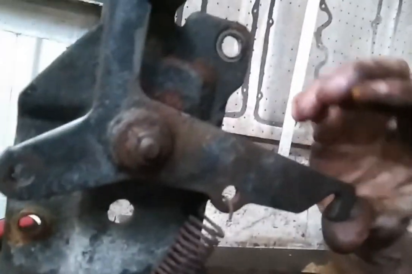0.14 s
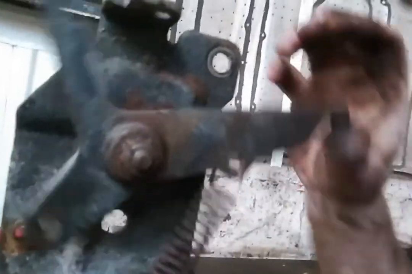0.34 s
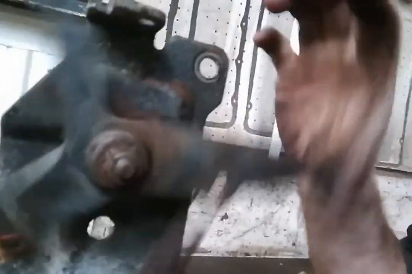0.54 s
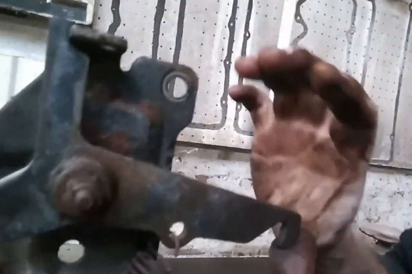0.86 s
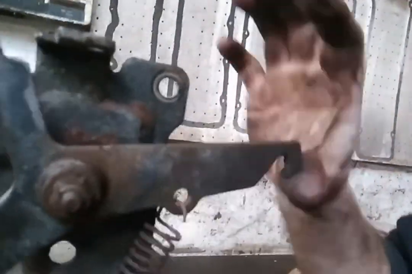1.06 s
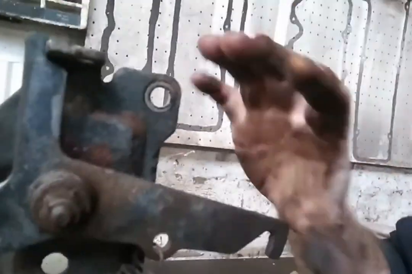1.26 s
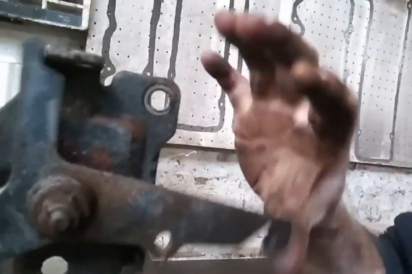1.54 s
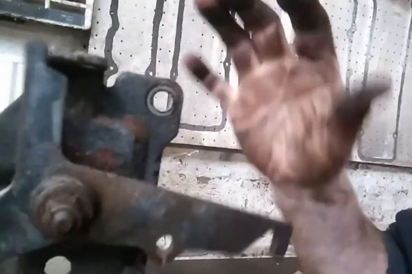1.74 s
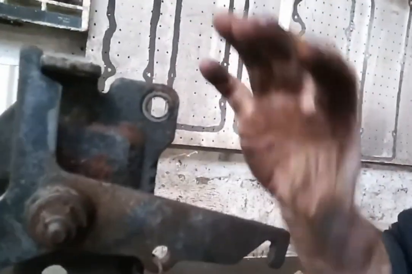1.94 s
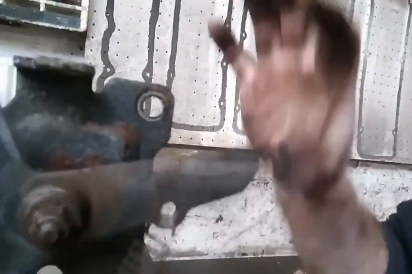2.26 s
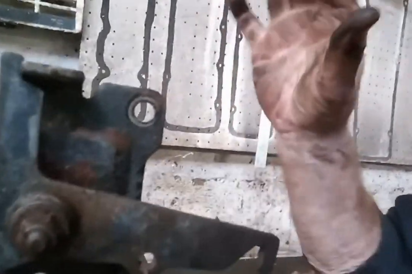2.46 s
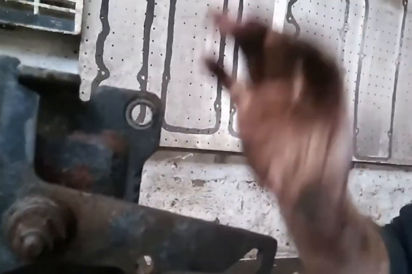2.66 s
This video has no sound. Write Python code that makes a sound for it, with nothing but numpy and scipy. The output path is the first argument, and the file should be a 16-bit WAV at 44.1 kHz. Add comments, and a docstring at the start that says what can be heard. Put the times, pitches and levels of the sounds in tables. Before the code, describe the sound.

A sprung steel lever snaps against its stop, close to a phone microphone in a hard-walled garage. Faint rubbing and scrapes lead to a light click at 0.4 s, a brighter one at 0.47 and a hard clack at 0.62. Another bright clack lands at 1.2, then rapid bouncing clatters at 1.73-1.81 and 2.31-2.38. Small ticks precede blows; low spring hum and short room ring follow.

```python
"""Sprung steel lever in a garage

A greased steel lever on a plate bracket is pushed by hand and snaps back on its coil spring, bouncing
on its stop: each blow is a noise crack over decaying steel modes. Around the blows come scrapes, faint
rustles and one rattle (shaped noise) and ticks (short treble clicks); between and after the blows the
spring hums (a fluttering low tone). A hard-walled garage rings on as a diffuse noise tail, over low
rumble and faint hiss. All is picked up by one phone microphone, with its bass cut and noise suppressor."""
import sys
import numpy as np
from scipy import signal
from scipy.fft import rfft, irfft
from scipy.io import wavfile
from scipy.ndimage import uniform_filter1d

SR = 44100
rng = np.random.default_rng(int(sys.argv[2]) if len(sys.argv) > 2 else 0)


def pcm_store(signal):
    """Save signal as 16-bit PCM."""
    levels = np.round(np.clip(np.atleast_2d(signal), -1, 1) * 32767)
    wavfile.write(sys.argv[1], SR, levels.astype(np.int16).T)


def nominal_scale(level):
    """Amplitude ratio for a level in decibels (scalar or array-like)."""
    x = np.asarray(level, float) / 20
    return 10 ** x


N = 123479  # samples
T = np.arange(N) / SR  # s
F = np.fft.rfftfreq(N, 1 / SR)  # Hz


def log_curve(f, points):
    """Gain read from (f/Hz, level/dB) points along a logarithmic frequency axis."""
    p = np.array(points, float)
    return nominal_scale(np.interp(np.log(f + 1), np.log(p[:, 0]), p[:, 1]))


def colour(x, points):
    """Filter by (f/Hz, level/dB) points, without phase shift."""
    f = np.fft.rfftfreq(len(x), 1 / SR)
    return irfft(rfft(x) * log_curve(f, points), len(x))


def unit(x):
    """Scale to rms 1."""
    return x / np.sqrt(np.mean(x ** 2))


def band(hz, width_hz):
    """Noise in a bell-shaped band, rms 1."""
    bell = np.exp(-((F - hz) / width_hz) ** 2)
    return unit(irfft(rfft(rng.standard_normal(N)) * bell, N))


def fade(t, t60):
    """Exponential decay by 60 dB in t60 seconds."""
    return np.exp(-np.log(1000) * t / t60)


def swell(s, rise, hold, t60):
    """Envelope from s seconds: straight rise, hold, exponential release."""
    return np.clip((T - s) / rise, 0, 1) * fade(np.maximum(T - s - rise - hold, 0), t60)


def add(out, x, s):
    """Mix x into out at s seconds."""
    i = int(s * SR)
    out[i:i + len(x)] += x[:N - i]


# low-mid rumble of the place: t/s, level/dB
LOW_MID_RUMBLE = [(0, -59), (.3, -56), (.55, -57), (.75, -46.5), (1.05, -71.5), (1.3, -70.5), (1.65, -71.5),
                  (2.8, -81)]
# deep rumble under it: t/s, level/dB
DEEP_RUMBLE = [(0.0, -87), (0.26, -66), (0.44, -79), (0.68, -51), (1.12, -74), (1.21, -59.5), (1.41, -52.5),
               (1.43, -60), (1.67, -74), (1.74, -45.5), (2.26, -65), (2.31, -55.5), (2.43, -45.5),
               (2.46, -44), (2.77, -68.5), (2.8, -89)]
# colour of the steady hiss: f/Hz, level/dB
HISS_COLOUR = [(180, -39.5), (300, -2), (2320, -12.5), (3130, -10.5), (3890, -22.5), (13300, -32.5),
               (16000, -24)]


def background():
    """Room floor: two bands of low noise following level curves, and a steady faint hiss."""
    low_mid = band(220, 70) * nominal_scale(np.interp(T, *np.array(LOW_MID_RUMBLE).T))
    deep = band(75, 42) * nominal_scale(np.interp(T, *np.array(DEEP_RUMBLE).T))
    hiss = nominal_scale(-84.5) * unit(colour(rng.standard_normal(N), HISS_COLOUR))
    return low_mid + deep + hiss


# ring of the garage by band: f/Hz, relative level/dB, t60/s
GARAGE_BANDS = [(83, -22.5, 0.87), (180, 0, 0.37), (345, -11.5, 0.47), (710, -11.5, 0.54),
                (1300, -16.5, 0.66), (2840, -16.5, 0.58), (5400, -21.5, 0.47), (7500, -31.5, 0.46),
                (11500, -28, 0.19), (14500, -24.5, 0.26)]


def garage(x):
    """Diffuse tail of the hard walls: bands of noise, each dying at its own rate."""
    tail = np.zeros(N)
    for hz, db, t60 in GARAGE_BANDS:
        scale = np.sqrt(hz / 8000) / np.sqrt(t60 * SR / 14)
        tail += nominal_scale(db) * scale * band(hz, hz * 0.58) * fade(T, t60)
    onset = 1 - np.exp(-T / 0.0058)  # the tail builds up over some milliseconds
    return signal.fftconvolve(x, (tail * onset)[:SR])[:N]


# soft bumps of the palm on the lever: middle t/s, level/dB, f/Hz, half-length/s
PALM_BUMPS = [(.225, -61, 367, 0.056), (.335, -67, 398, 0.018), (1.03, -75.5, 422, 0.036),
              (1.645, -65.5, 440, 0.024), (1.722, -49, 250, 0.0099), (2.303, -48.5, 221, .008)]
# faint squeaks of the pivot: middle t/s, level/dB, f/Hz, half-length/s
PIVOT_SQUEAKS = [(1.025, -76, 4360, 0.026), (1.04, -75.5, 3180, 0.0088)]


def hand():
    """Dull palm bumps and thin squeaks, each a short bell-shaped swell of narrow noise."""
    out = np.zeros(N)
    for rows, relative_width in ((PALM_BUMPS, 0.24), (PIVOT_SQUEAKS, 0.019)):
        for s, db, hz, length in rows:
            out += nominal_scale(db) * band(hz, hz * relative_width) * np.exp(-((T - s) / length) ** 2)
    return out


# low spring hum, swelling between and after the blows: start t/s, level/dB, f/Hz, rise/s, t60/s
SPRING_HUM = [(.52, -47, 180, .02, 1), (.625, -27, 166.6, .025, 0.36), (.8, -47.5, 162.4, .04, 0.91),
              (1.14, -48.5, 170, .02, 0.31), (1.225, -38, 164.2, .03, 0.92),
              (1.295, -40.5, 169.5, .02, 0.25), (1.39, -53, 164.2, .02, 1),
              (1.815, -27.5, 149.6, .04, 0.33), (1.98, -44.5, 160.8, .05, 0.45),
              (2.41, -35.5, 147.6, .04, 0.47)]
HUM_PURE = 0.92  # steady share of the tone's amplitude


def spring():
    """The coil spring hums low, mostly tone, with flutter and a looser noisy part."""
    wobble = HUM_PURE + np.sqrt(1 - HUM_PURE ** 2) * band(0, 20)
    loose = nominal_scale(-9.5) * band(170, 32)
    out = np.zeros(N)
    for s, db, hz, rise, t60 in SPRING_HUM:
        tone = np.sqrt(2) * wobble * np.sin(2 * np.pi * hz * T)
        out += nominal_scale(db) * swell(s, rise, 0, t60) * (tone + loose)
    return out


# pitches of the lever and bracket modes: f/Hz
STEEL_HZ = [706, 746, 780, 990, 1490, 1535, 1780, 2180, 2850, 2960, 3140, 3415, 3770, 4280, 5300, 5830,
            7340, 8180, 8330, 9580, 10500, 10860, 12500, 13595, 14390, 15495]
# how those modes ring, one row per pitch: level/dB, t60/s
STEEL_RINGS = [(-7.5, 0.1), (-7.5, 0.09), (-31.5, 0.93), (-16, 0.091), (1, 0.11), (-5, 0.1), (-2, 0.092),
               (-12.5, .12), (-9.5, 0.067), (-12, 0.081), (-2, 0.051), (2.5, 0.053), (-9, .06),
               (-1.5, 0.041), (-2.5, 0.045), (-1.5, 0.048), (-4, 0.033), (-22.5, 0.39), (-7.5, .05),
               (-20, 0.043), (-12, 0.036), (-12, .06), (-11, 0.014), (-14.5, 0.045), (-13, .03),
               (-5, 0.045)]
SCATTER_DB, DETUNE = 2.5, 0.0042  # spread of mode level, and of pitch as a fraction
FLUTTER, FLUTTER_HZ = 0.35, 56.3  # depth, and random points per second


def steel(scatter):
    """Ring of each steel mode; rows of scatter vary its level, phase (cycles) and pitch; each flutters."""
    t = T[:SR]
    level_scatter, phase, pitch_scatter = scatter[:, :, None]
    level_db, t60 = np.array(STEEL_RINGS).T[:, :, None]
    knots = rng.standard_normal((len(STEEL_HZ), SR // 100))
    wander = np.array([np.interp(t * FLUTTER_HZ, np.arange(len(k)), k) for k in knots])
    hz = np.array(STEEL_HZ)[:, None] * (1 + DETUNE * pitch_scatter)
    tone = np.sin(2 * np.pi * (hz * t + phase))
    return nominal_scale(level_db + SCATTER_DB * level_scatter) * tone * fade(t, t60) * (1 + FLUTTER * wander)


# starts of the scrapes, faint rustles and one rattle: t/s
RUB_STARTS = [0, .058, .185, .325, .402, .44, .474, .56, 1.076, 1.14, 1.55, 1.634, 1.646, 2.253, 2.285]
# one row per start: level/dB, treble/dB, ring of the steel/dB, attack/s, hold/s, release t60/s
RUB_STROKES = [(-71, -9, -16, 0.013, 0.052, .2), (-61.5, -0.8, -6, 0.0027, .06, .3),
               (-50.5, -1, -11.5, 0.00099, 0.025, .4), (-46.5, -2, 3.3, 0.005, .006, .1),
               (-44, -2, -1.5, 0.0014, 0.0024, .1), (-60.5, -14.5, 2.5, 0.014, 0.019, .1),
               (-33.5, -10, 4.5, 0.0026, 0.007, .12), (-60.5, 3, 2, 0.0064, .05, .1),
               (-43, -6, -2, 0.0064, 0.0085, .12), (-58.5, 2.9, -2, 0.06, 0.021, .1),
               (-72, -1.2, -2, 0.046, 0.064, .1), (-53, -2, -0.5, 0.0037, 0.02, .2),
               (-52, -9, -8, .003, 0.035, 0.12), (-50, -8, 1.5, 0.002, .015, .15),
               (-55, 3.5, 3, 0.012, 0.0085, .1)]
# colour of the rubbing: f/Hz, level/dB
RUB_COLOUR = [(300, -53), (600, -19), (900, -23.5), (1200, -8), (2100, 3.5), (2600, -3), (3300, -1.6),
              (4400, -9.5), (5600, -12), (7800, -5), (9300, -7), (10600, -5.5), (13500, -10.5),
              (15000, -25), (16000, -21.5)]
RUB_TREBLE_HZ = 4740


def scrapes_and_rustles():
    """Dense friction noise of scrapes, rustles and a rattle, partly ringing the steel."""
    grain = nominal_scale(2 * band(0, 150))  # random roughness of the level
    body = steel(np.zeros((3, len(STEEL_HZ)))).sum(axis=0)
    friction = rng.standard_normal(N)
    driven = np.diff(signal.fftconvolve(rng.standard_normal(N), body))[:N]
    split = [(RUB_TREBLE_HZ, 0), (RUB_TREBLE_HZ * 2, -40)]
    rub, ring = (unit(colour(x, RUB_COLOUR)) * grain for x in (friction, driven))
    rub_low, ring_low = colour(rub, split), colour(ring, split)
    rub_high, ring_high = rub - rub_low, ring - ring_low
    out = np.zeros(N)
    for s, (db, treble_db, ring_db, attack, hold, t60) in zip(RUB_STARTS, RUB_STROKES):
        low = rub_low + nominal_scale(ring_db) * ring_low
        high = rub_high + nominal_scale(ring_db) * ring_high
        out += nominal_scale(db) * swell(s, attack, hold, t60) * (low + nominal_scale(treble_db) * high)
    return out


# small ticks of the spring coils: t/s, level before filtering/dB, lowest f/Hz
COIL_TICKS = [(0.3164, -22, 2005), (0.526, -22.5, 4220), (1.1341, -33, 3920), (1.184, -36, 3100),
              (1.7137, -19, 4120), (1.7182, -29.5, 3970), (2.1625, -42.5, 4220), (2.2498, -31.5, 2920),
              (2.2574, -27, 3000)]


def ticks():
    """Spring coils tick: very short noise bursts with the bass cut and the top softened."""
    out, t = np.zeros(N), T[:SR // 20]
    for s, db, low_hz in COIL_TICKS:
        bass_cut = signal.butter(4, low_hz, "high", fs=SR, output="sos")
        soft_top = signal.butter(1, 11000, fs=SR, output="sos")
        burst = rng.standard_normal(len(t)) * fade(t, 0.0035)
        add(out, nominal_scale(db) * signal.sosfilt(np.vstack([bass_cut, soft_top]), burst), s)
    return out


# lever hits the stop: t/s, level/dB, brightness/(dB per octave), narrowing round 3.3 kHz/(dB per
# octave squared), weight of the low knock/dB, strength of its tail/dB
STOP_BLOWS = [(.4025, -32.5, .4, 2.5, -6.5, -3), (0.4685, -15, 5.5, 4, 13.5, -4.5),
              (.618, -5, -1.5, 0.84, 4, -9.5), (1.192, -32.5, -5, 1.5, 3.5, 6),
              (1.199, -2.5, 1.53, -0.27, 1.5, -2.5), (1.21, -8.5, -1.24, 0.83, 3, -1.2),
              (1.729, -2, 1.9, -0.42, -0.7, 3), (1.754, -3, 2, -0.5, -2.5, 0),
              (1.774, -4.5, 1.6, -1.2, -2, -2), (1.788, -11, 1.8, -2.2, -13, -13.5),
              (1.801, -8.5, 0.7, -0.6, -13.5, 3.5), (1.81, -12.5, -2.1, 0.4, -4, 5),
              (2.31, -3, 1.5, 0.22, 4, 0.8), (2.315, -7.5, 2.6, -0.7, -7.5, 0.7),
              (2.338, -3, 2.25, -0.4, 4, -1.5), (2.345, -13.5, 7.5, 1.8, -17.5, -7.5),
              (2.359, -7, -2, 0.34, -3, 5), (2.374, -8, 5, -0.2, 0, -9), (2.379, -8.5, -0.5, 0.5, -1.5, 5)]
# colour of the crack before each blow's own shading: f/Hz, level/dB
CRACK_COLOUR = [(60, -23), (300, -4), (800, -3), (2000, 2.5), (4000, 1.5), (8000, -4), (12000, -4),
                (15500, -10)]
CRACK_DB, CRACK_T60_S, CRACK_RISE_S, CRACK_DULL_HZ = -6, 0.043, 0.00082, 6240
SNAP_DB, SNAP_T60_S = -12, 0.004  # the crack's treble is a shorter snap
RING_DB, RING_TAIL_DB = -13.5, -6  # steel ring heard directly, and its further cut into the tail
KNOCK_BELOW_HZ, LASTING_S = 1200, 0.2


def blows():
    """Each blow is a crack, treble snap and ringing modes; returns the near sound and the tail's feed."""
    near, send = np.zeros(N), np.zeros(N)
    t, hz = T[:SR], np.array(STEEL_HZ)
    lasting = np.array(STEEL_RINGS)[:, 1] > LASTING_S  # long modes follow the strength of the tail
    rise = 1 - np.exp(-t / CRACK_RISE_S)
    dulling = signal.butter(2, CRACK_DULL_HZ, fs=SR, output="sos")
    for s, db, tilt_db, narrow_db, knock_db, tail_db in STOP_BLOWS:
        def shade(f):
            """Level in dB that this blow gives to frequency f."""
            octaves = np.log2(f / 3300)
            return tilt_db * octaves - narrow_db * octaves ** 2 + knock_db * (f < KNOCK_BELOW_HZ)

        modes = steel(rng.standard_normal((3, len(hz))))
        ring = nominal_scale(db + RING_DB) * rise * (nominal_scale(shade(hz) + 2 * tail_db * lasting) @ modes)
        noise = unit(colour(rng.standard_normal(len(t)), [(f, d + shade(f)) for f, d in CRACK_COLOUR]))
        dull = signal.sosfilt(dulling, noise) * fade(t, CRACK_T60_S)
        snap = nominal_scale(SNAP_DB) * noise * fade(t, SNAP_T60_S)
        add(near, ring + nominal_scale(db + CRACK_DB) * rise * (dull + snap), s)
        # the walls get the crack undulled and without its rise
        full_crack = nominal_scale(CRACK_DB + db) * noise * fade(t, CRACK_T60_S)
        add(send, nominal_scale(tail_db) * (nominal_scale(RING_TAIL_DB) * ring + full_crack), s)
    return near, send


def scene():
    """All sources and the garage at one microphone, the same in both channels."""
    hits, send = blows()
    small = ticks() + scrapes_and_rustles()
    tail = garage(nominal_scale(6.5) * send + nominal_scale(6) * small)
    mono = hits + small + tail + spring() + hand() + background()
    return np.array([mono, mono])


# spectral lines near or under this level are turned down: f/Hz, level/dB
SUPPRESS_UNDER = [(100, -105), (250, -93), (500, -90), (1200, -100), (4000, -102), (12000, -108)]


def suppress(x):
    """Noise suppressor: quiet spectral lines are turned down, by 17 dB at most."""
    f, _, z = signal.stft(x, SR, nperseg=512)
    power = uniform_filter1d(np.abs(z) ** 2, size=5, axis=-1)  # smoothed over time
    power = uniform_filter1d(power, size=3, axis=-2)  # smoothed over frequency
    under = log_curve(f, SUPPRESS_UNDER)[:, None]
    gain = np.maximum(1 - under ** 2 / (power + 1e-18), nominal_scale(-17))
    return signal.istft(z * gain, nperseg=512)[1][:, :N]


def low_pass(x):
    """Removes everything above the highest recorded frequency."""
    return signal.sosfilt(signal.butter(12, 16990, fs=SR, output="sos"), x)


def record(dry):
    """Phone microphone: bass cut, noise suppressor, a trace of high hiss, soft peaks, a treble cut."""
    bass_cut = signal.butter(2, 46, "high", fs=SR, output="sos")
    treble_cut = signal.cheby1(8, 0.5, 15900, fs=SR, output="sos")
    x = suppress(signal.sosfilt(bass_cut, dry))
    x = x + nominal_scale(-87.5) * band(14000, 1500)
    x = np.tanh(0.8 * x) / 0.8
    return low_pass(signal.sosfilt(treble_cut, x))


dry = scene()
out = record(dry)
pcm_store(out)
```